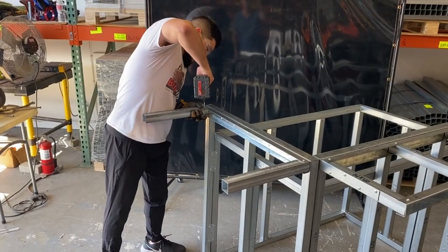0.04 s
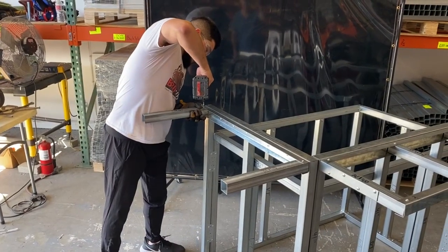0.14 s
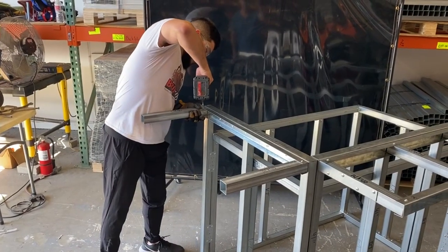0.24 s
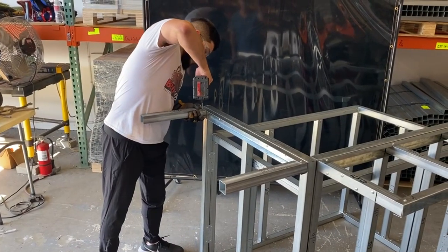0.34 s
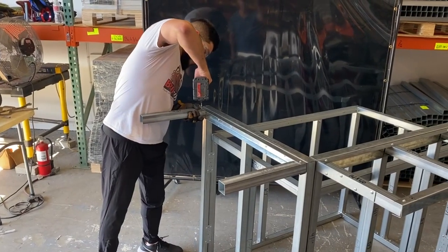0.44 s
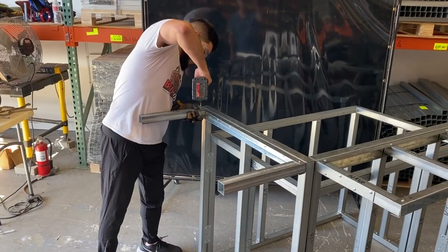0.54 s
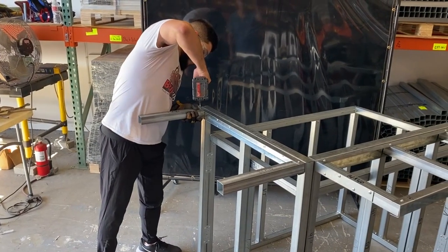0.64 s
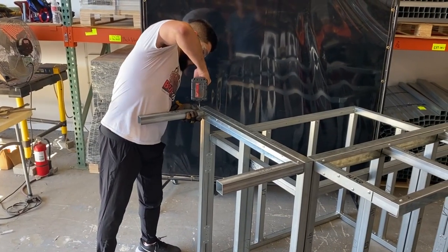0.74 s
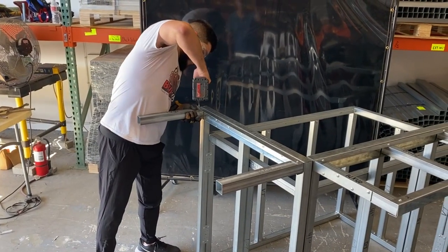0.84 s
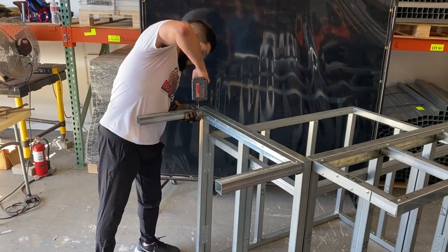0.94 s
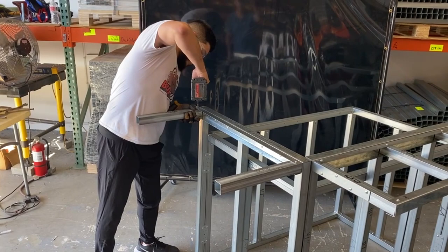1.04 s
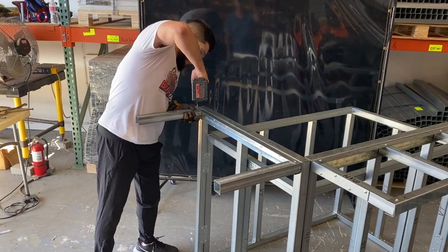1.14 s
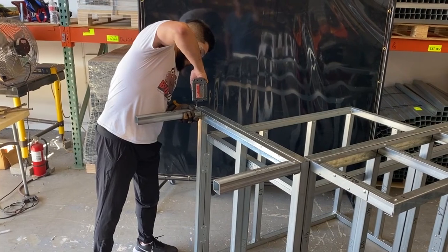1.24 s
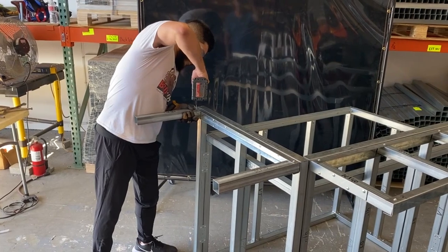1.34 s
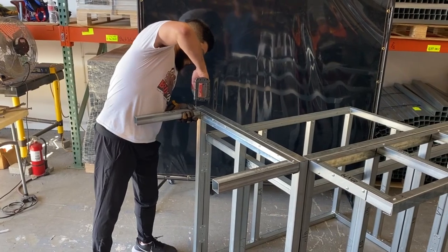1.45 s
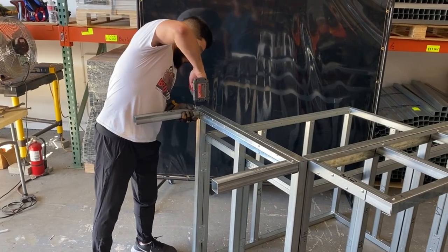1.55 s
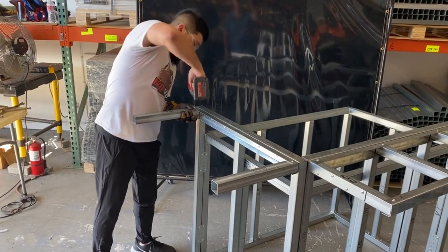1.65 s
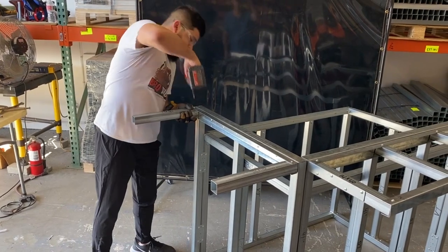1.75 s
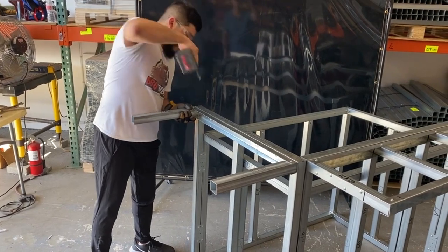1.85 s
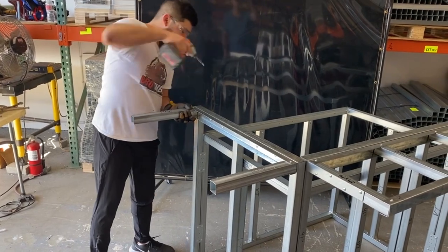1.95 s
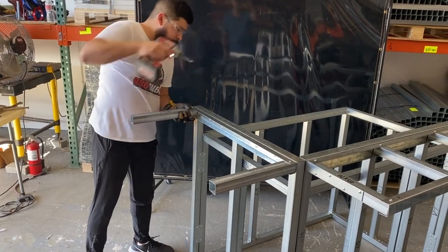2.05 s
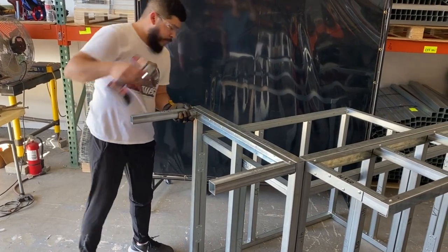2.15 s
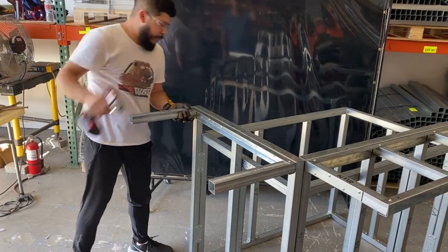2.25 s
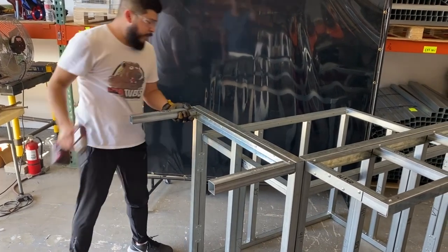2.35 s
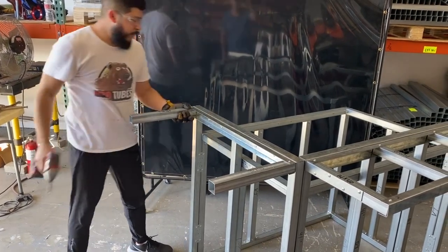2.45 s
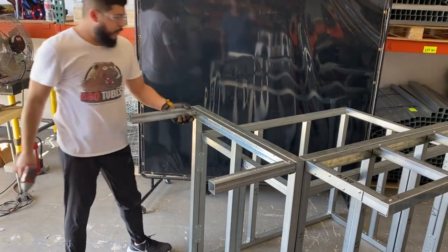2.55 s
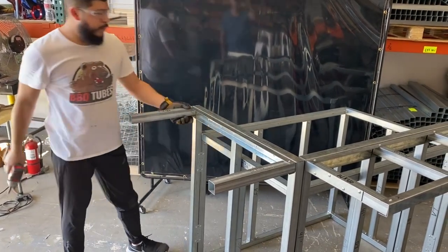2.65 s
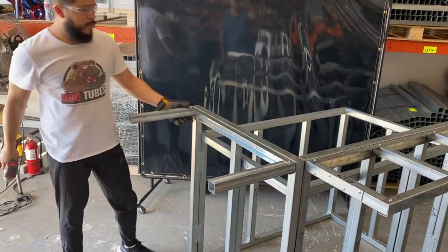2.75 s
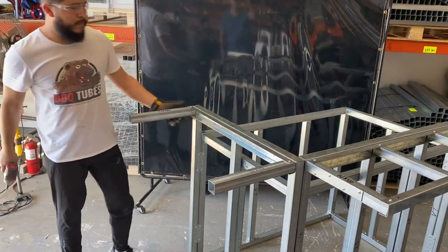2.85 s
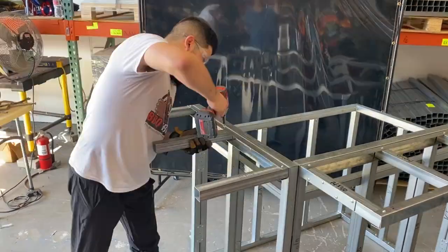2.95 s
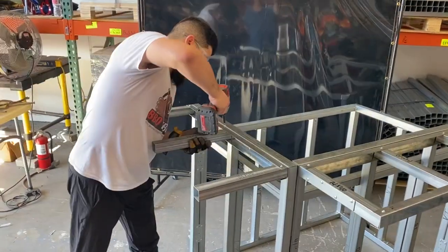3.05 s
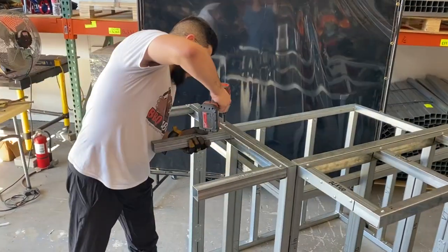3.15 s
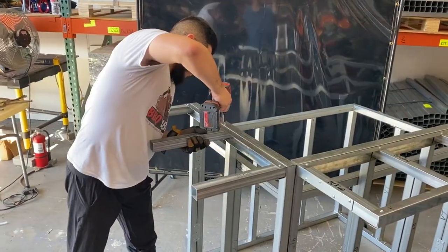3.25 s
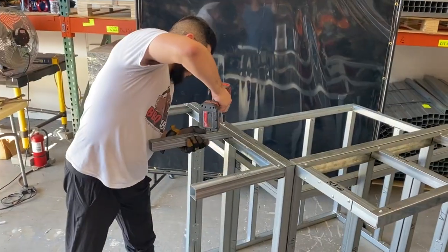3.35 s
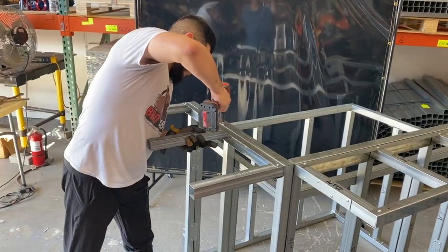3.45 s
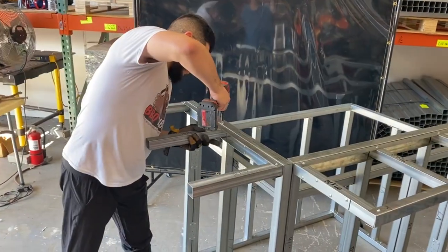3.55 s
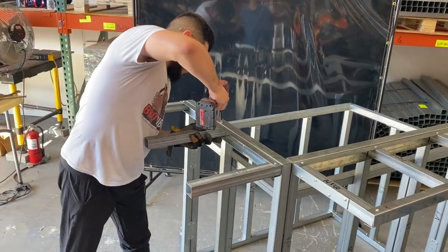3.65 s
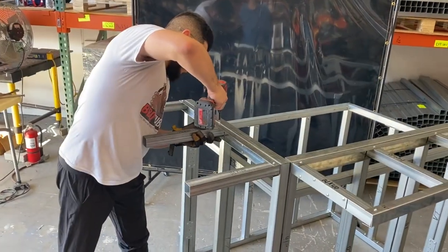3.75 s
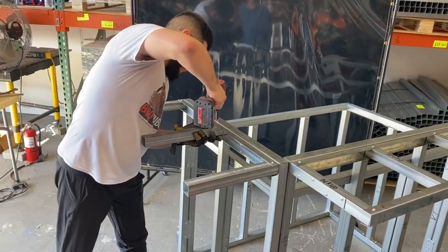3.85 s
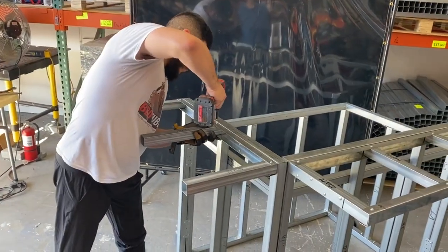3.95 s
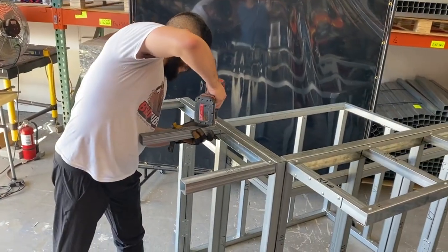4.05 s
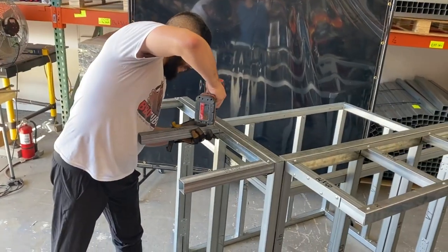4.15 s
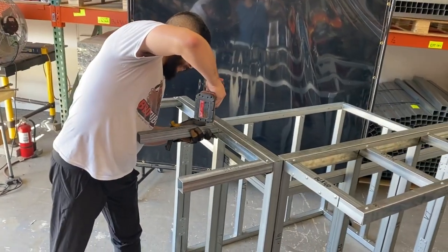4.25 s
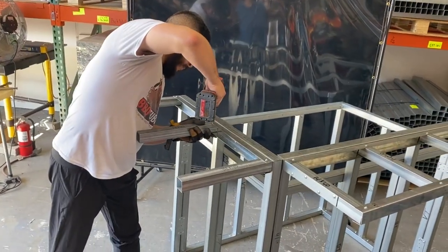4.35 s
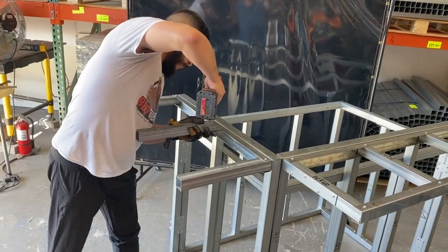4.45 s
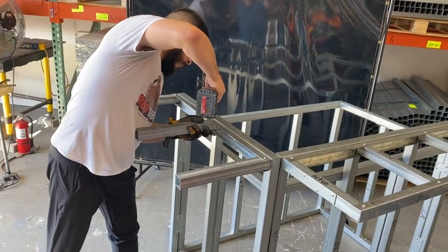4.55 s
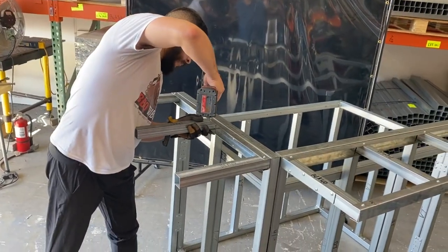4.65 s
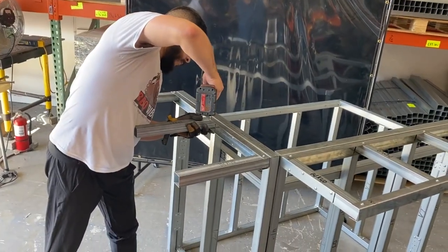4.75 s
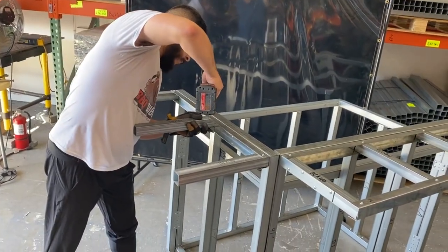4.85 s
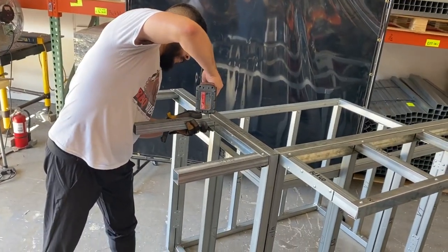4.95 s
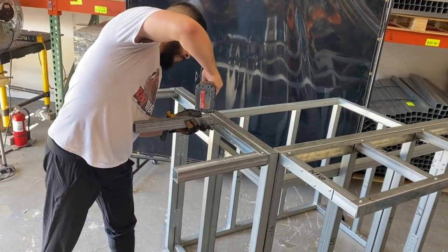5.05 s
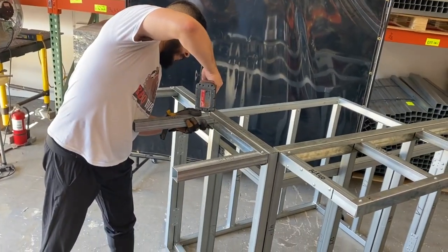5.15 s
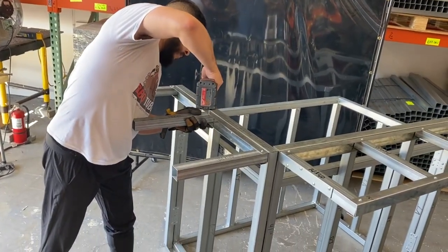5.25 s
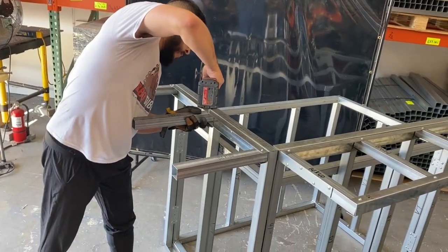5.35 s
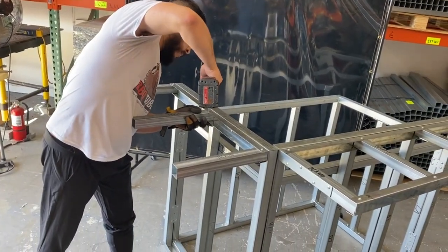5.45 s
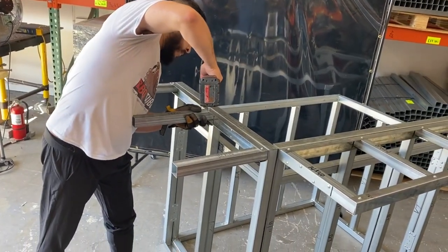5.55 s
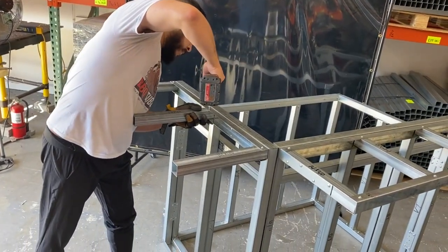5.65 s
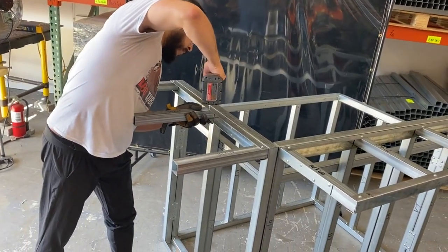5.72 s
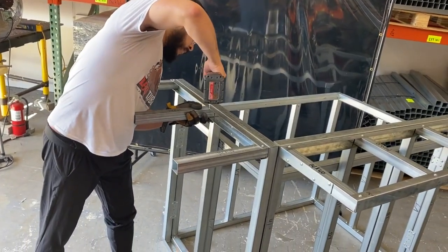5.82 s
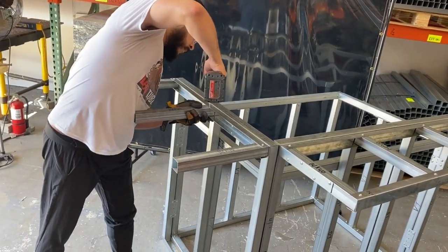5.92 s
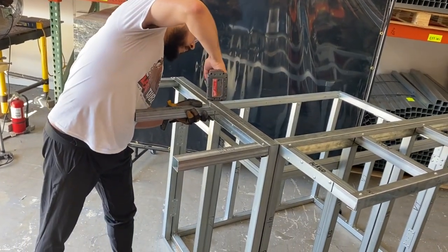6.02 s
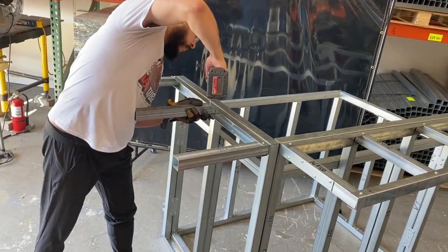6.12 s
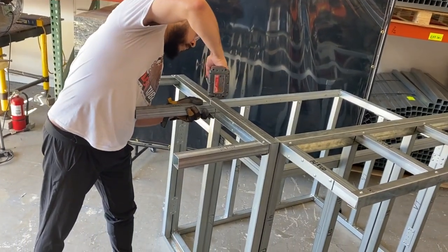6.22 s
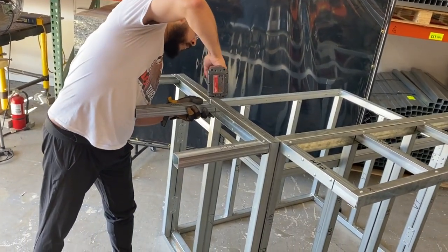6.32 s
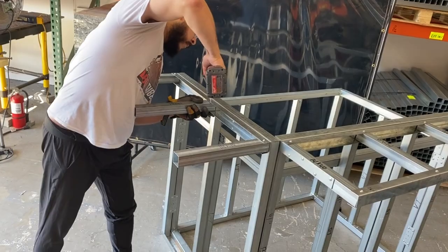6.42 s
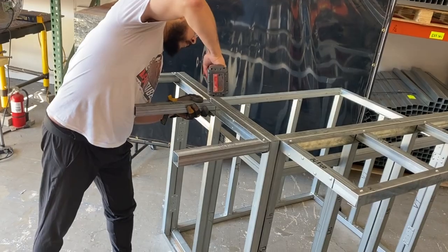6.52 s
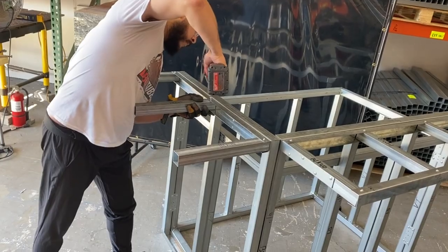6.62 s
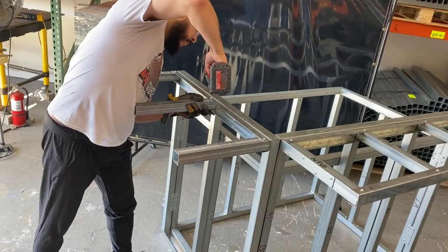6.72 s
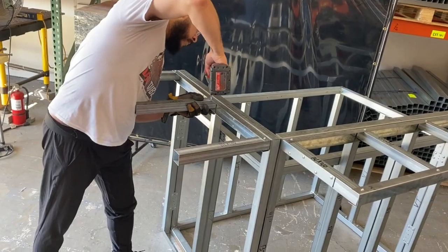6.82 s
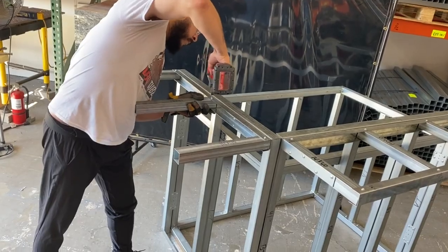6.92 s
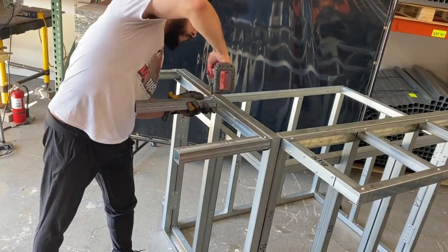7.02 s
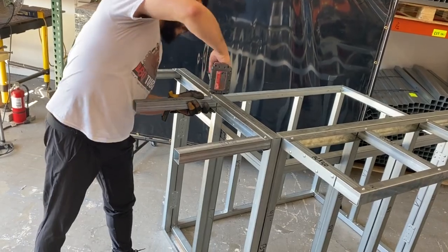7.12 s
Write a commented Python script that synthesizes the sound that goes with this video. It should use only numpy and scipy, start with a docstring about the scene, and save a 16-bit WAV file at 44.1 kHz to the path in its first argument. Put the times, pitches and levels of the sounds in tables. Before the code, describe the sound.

A cordless impact driver works on a steel tube frame in an open-fronted, reverberant workshop, heard in stereo from a few metres, with low ventilation rumble throughout. From 0 s the motor is already whining under load, with a rough gear whirr and harsh chatter of the tip cutting steel. Its pitch sags, and from 1.25 to 1.6 s quick hammer blows rattle about 35 times a second before the motor stops. A metallic knock comes near 1.86 s, then faint rustling and scraping; the sound drops out briefly at 3 s. A dull knock lands at 4.0 s, small scrapes and taps at 4.2 s. At 4.8 s the tip groans, then slips with a bright clatter at 4.97 s as the motor spins up. It runs freely, bites around 6 s, sinks in pitch, and hammers from 6.75 s until the end at about 7.1 s.

```python
"""A cordless impact driver sinks two self-drilling screws into a frame of steel tube in an open-fronted workshop.
Rotor tones sag as the tip bites and chatters in the tube wall; noise bursts make the hammer rattle each screw tight.
Between the screws the frame is knocked and scraped, as noise ringing through tube modes; ventilation rumbles behind.
The driver's motor is heard more directly than the wide frame, and the level dips once briefly."""
import sys
import numpy as np
from scipy import signal
from scipy.fft import rfft, irfft, next_fast_len
from scipy.io import wavfile

SR = 44100
rng = np.random.default_rng(int(sys.argv[2]) if len(sys.argv) > 2 else 0)


def store_wav(level_fs):
    """Save 16-bit WAV to argv[1]."""
    pcm = np.round(np.clip(np.atleast_2d(level_fs), -1, 1) * 32767)
    wavfile.write(sys.argv[1], SR, pcm.T.astype(np.int16))


N = 316549
TIME = np.arange(N) / SR  # seconds

# All levels are relative, ahead of load, room and final mix.
# Trigger pulls, the first before the start: pulled_s, released_s, gear_level_db, whine_level_db, hum_level_db
TRIGGER_PULLS = [(-1, 1.59, -31.2, -37.5, -44), (4.775, 7.07, -29.7, -36, -36)]
SPIN_UP_S, GEARS_RISE_S, RUN_DOWN_T60_S = .2, .21, .18
FREE_SPEED = 360  # turns per s without load
GEARS_DB_PER_LOAD, WHINE_DB_PER_LOAD = 22, 12
# Below this speed (turns per s) all motor tones lose so many dB per turn/s
STALL_SPEED, STALL_DB = 290, .6
# Motor speed under the load of each screw, before spin-up: time_s, speed_turns_per_s
FIRST_SCREW_SPEED = [(0, 322), (.15, 313), (.42, 315), (.58, 318), (.88, 311), (1.22, 288), (1.6, 270)]
SECOND_SCREW_SPEED = [(5.42, 359), (5.62, 352), (5.9, 334), (6.12, 307), (6.34, 321.5), (6.56, 316),
                      (7.1, 268)]
# Tones of rotor, gears and fan: multiple_of_turning_rate, level_db
ROTOR_TONES = [(1, -21), (2, -2.5), (3, -7), (4, -20), (8, -14.5), (11, -12), (15, 3), (22, -8), (30, -4.5)]
# Colour of the gear rattle, also of the slipping bit: pitch_hz, level_db
GEAR_COLOUR = [(100, -10.5), (350, -17.5), (800, -5.5), (1500, -3.5), (3000, -4.5), (3900, -2), (5000, -3),
               (7200, -6), (8800, -4.5), (10300, -7), (12500, -10.5), (15800, -10.5)]
# Motor coasting after the first screw: start_s, rise_s, end_s, level_db, sag_db_per_s
COASTS = [(1.6, .02, 1.8, -52, 0)]

# Tip biting into the steel: start_s, rise_s, end_s, level_db, sag_db_per_s
BITES = [(0, .18, 1.28, -23.3, 2.5), (.33, .11, .46, -23, 0), (5.95, .21, 6.72, -26, 13),
         (6.66, .13, 6.86, -26, 10)]
BITE_T60_S = .2
# Colour of the chips, also of the slip's jolt: pitch_hz, level_db
BITE_COLOUR = [(50, -35), (130, -8), (220, -10), (350, -4.5), (550, -6), (1000, -1.5), (1250, -3),
               (1600, 0), (2200, -1.5), (2900, -9.5), (4000, -6.5), (6500, -15), (9000, -25),
               (16000, -31.5)]
# Colour of the thump at each catch: pitch_hz, level_db
CATCH_COLOUR = [(70, -5.5), (215, 2.5), (400, -3), (900, -3.5), (2500, -39)]
# Ringing modes of the steel frame: pitch_hz, level_db, t60_s
FRAME_MODES = [(554, -12, .3), (825, -4, .15), (1110, -4, .2), (1351, -4, .4), (1497, 0, .2),
               (1556, -2, 1.4), (1762, 4.5, .35), (1865, -2, .25), (2068, -7, .2), (2490, -9, .15),
               (2821, -6, .2), (3090, -4, .2), (3182, -10, .7), (3480, -6, .2), (3865, -5, .4),
               (3995, 2.5, .15), (4070, 2.5, .15), (4200, -6, .2)]

# Whirr of the loaded gear mesh: start_s, rise_s, end_s, level_db, sag_db_per_s
WHIRRS = [(-.1, .1, 1.2, -30, 9), (5.55, .25, 6.55, -30.5, 1.5)]
WHIRR_T60_S = .3

# Colour of the ventilation: pitch_hz, level_db
RUMBLE_COLOUR = [(20, -32.5), (46, -4), (70, 0), (126, -3), (155, -12), (380, -22), (800, -27), (1650, -33),
                 (3100, -53.5), (8000, -65), (15000, -72)]

# Hammer blows: time_s, first_crack_db, bright_clack_db, tube_thud_db
BLOWS = [(1.2446, -17, -16, -14), (1.272, -24, -18, -16), (1.2964, -24, -17, -27),
         (1.3219, -15, -11.5, -24), (1.3513, -12, -13.5, -26), (1.3815, -22, -16, -29),
         (1.4077, -17, -11, -30), (1.4346, -22, -18, -36), (1.4626, -14, -16, -34), (1.4944, -26, -20, -38),
         (1.5254, -18, -16.5, -36), (1.5494, -13, -14.5, -32), (1.5708, -13, -13, -32),
         (1.591, -18, -16, -30), (6.7534, -20, -12, -18), (6.7815, -8, -16, -26), (6.8064, -15, -18, -24),
         (6.879, -24, -16, -20), (6.9735, -11, -11, -34), (6.9955, -17, -15, -42),
         (7.0165, -12, -12.5, -35), (7.041, -17, -17, -40), (7.069, -13, -17, -38)]
# Colours of clack and thud: pitch_hz, level_db
CLACK_COLOUR = [(80, -12.5), (300, -17.5), (900, -20), (2000, -1), (3600, 5), (6500, -2), (8800, 1),
                (10700, 2.5), (12500, -1), (14700, 1.5), (16000, -3)]
THUD_COLOUR = [(100, -18), (500, -10), (1000, -3), (1500, 4.5), (2300, 0), (4000, -8), (9000, -25),
               (16000, -32)]
# Colour of the first screw's seating bump: pitch_hz, level_db
BUMP_COLOUR = [(40, -13), (120, -1), (1200, -29.5)]

# Knocks of the tool and the loose tube: time_s, dull_thud_db, metallic_clank_db
KNOCKS = [(1.857, -38, -38), (2.716, -55, -68), (3.661, -54, -70), (3.9983, -30, -50), (4.176, -58, -49),
          (4.216, -60, -51)]
# Colours of the dull thud and the clank: pitch_hz, level_db
KNOCK_COLOUR = [(100, -25), (450, -7), (800, 5.5), (1250, 4.5), (1800, -5.5), (2600, -10.5), (3600, -21.5),
                (7000, -42.5), (16000, -50)]
CLANK_COLOUR = [(500, -17), (1500, -6), (2500, 0), (3600, -11), (12000, -34)]
# Glove and tool sliding on the frame: start_s, rise_s, end_s, level_db, sag_db_per_s
SLIDES = [(1.95, .25, 2.27, -72, 0), (2.68, .065, 2.755, -56.5, 50), (4.134, .008, 4.172, -47, 60),
          (4.171, .008, 4.232, -44, 60)]
# Cloth and gloves rustling: start_s, rise_s, end_s, level_db, sag_db_per_s
RUSTLES = [(2.03, .02, 2.12, -68, 0), (2.226, .006, 2.245, -63, 0), (2.68, .025, 2.76, -59, 40),
           (3.46, .05, 3.95, -64, 0)]
SLIDE_T60_S, RUSTLE_T60_S = .18, .22
# Colours of scrape and rustle: pitch_hz, level_db
SCRAPE_COLOUR = [(300, -8), (1900, 3.5), (3300, -4), (4100, -1.5), (5600, -9.5), (15000, -29)]
RUSTLE_COLOUR = [(900, -14), (2500, -18), (7000, -25.5), (15000, -24.5)]

# Groan of the tip skating on the steel: time_s, pitch_hz, level_db
GROAN = [(4.78, 1150, -48), (4.845, 1020, -39), (4.874, 860, -36), (4.894, 1060, -28), (4.925, 1000, -48)]
# The bit slips and clatters in the screw head
SLIP_S, SLIP_DB, SLIP_THUD_DB, SLIP_HOLD_S, SLIP_T60_S = 4.9695, -15.5, -31, .018, .38

# Decay of the workshop: pitch_hz, t60_s
HALL_T60 = [(150, .6), (600, .45), (1500, 1.05), (4000, .8), (8000, .48), (15000, .36)]
ALIKE_ABOVE_HZ = 8000  # echo bands starting above this are the same in both channels
# Level of the left channel over the right: pitch_hz, level_db
CHANNEL_BALANCE = [(350, -2.3), (1450, -1.5), (2400, 1.7), (3700, 0), (5100, 3.3), (6200, .5), (7400, 2),
                   (8700, 0)]
# Phase lead of the left channel over the right: pitch_hz, lead_radians
CHANNEL_LEAD = [(250, .1), (1500, .6), (4500, 1.2), (6600, .3), (8350, -3.1), (10100, -6.3), (12100, -9.4),
                (14000, -12.6), (16000, -15.7)]
# Brief dip in level: time_s, share_of_signal_lost
LEVEL_DIP = [(2.979, 0), (2.982, .97), (3.003, .97), (3.007, 0)]
CUTOFF_HZ = 15900


def from_db(db):
    """Decibels to gain."""
    return 10 ** (np.asarray(db) / 20)


def rms_one(x):
    """Scale to unit rms."""
    return x / np.sqrt(np.mean(x ** 2) + 1e-20)


def unit_energy(response):
    """Scale an impulse response so that it passes white noise at equal power."""
    return response / np.sqrt(np.sum(response ** 2, axis=-1, keepdims=True))


def in_time(rows):
    """Read a two-column table at every sample."""
    return np.interp(TIME, *np.transpose(rows))


def at_hz(points, hz):
    """Read a table on a log-frequency axis."""
    freqs, values = np.transpose(points)
    return np.interp(np.log(np.maximum(hz, 1)), np.log(freqs), values)


def drift(rate):
    """Chance values of spread 1, rate per second, joined by straight lines."""
    knots = rng.standard_normal(N // 20)
    return np.interp(TIME * rate, np.arange(len(knots)), knots)


def convolve(x, response):
    """Play a mono or stereo signal through a response."""
    return signal.fftconvolve(np.atleast_2d(x), np.atleast_2d(response), axes=-1)[:, :N]


def colour(x, spectrum, size=8192):
    """Causal (minimum-phase) filter of the given spectrum, at unit power."""
    hz = np.arange(size // 2 + 1) * SR / size
    cepstrum = irfft(np.log(from_db(at_hz(spectrum, hz))))
    # fold the cepstrum forward in time for minimum phase
    cepstrum[1:size // 2] *= 2
    cepstrum[size // 2 + 1:] = 0
    response = irfft(np.exp(rfft(cepstrum)))
    return convolve(x, unit_energy(response))


def grains(per_s, spread_db):
    """Random tiny contacts of uneven but bounded size, rms 1."""
    strength_db = spread_db * np.clip(rng.standard_normal(N), -2, 2)
    sizes = rng.uniform(-0.98, 1, N) * from_db(strength_db)
    return rms_one((rng.random(N) < per_s / SR) * sizes)


def bursts(times, levels_db, hold, t60):
    """Noise bursts that hold, die away and end after a quarter second; overlaps add in power."""
    power = np.zeros(N)
    age = TIME[:SR // 4]
    shape = from_db(-60 * np.maximum(age - hold, 0) / t60)
    for time_s, level_db in zip(times, levels_db):
        part = power[int(time_s * SR):][:len(age)]
        part += (from_db(level_db) * shape[:len(part)]) ** 2
    return np.sqrt(power) * rng.standard_normal(N)


def stroke(start, rise, end, db, sag, t60):
    """Gain of one action: it rises evenly, sags while it lasts, then dies away."""
    attack = np.clip((TIME - start) / max(rise, .001), 0, 1)
    held = np.clip(TIME - start - rise, 0, max(end - start - rise, 0))
    fade_db = 60 * np.maximum(TIME - end, 0) / t60
    return attack * from_db(db - sag * held - fade_db)


def strokes(rows, t60):
    """Gain of a table of actions, added in power."""
    return np.sqrt(sum(stroke(*row, t60) ** 2 for row in rows))


def frame(force, ring_db):
    """A force is heard directly and through the long modes of the tubes."""
    age = TIME[:SR]
    modes = 0
    for hz, db, t60 in FRAME_MODES:
        decay = from_db(db - 60 * age / t60) / np.sqrt(t60)
        phase = rng.random((2, 1))  # its own in each channel
        modes = modes + decay * np.sin(2 * np.pi * (hz * age + phase))
    return force + from_db(ring_db) * convolve(force, unit_energy(modes))


def ventilation(level_db=-49.0, apart_db=-13, hum_db=-58):
    """A low rumble of coloured noise, nearly alike in both channels, with a wavering hum."""
    mid, side = rng.standard_normal((2, N))
    rumble = colour(mid + from_db(apart_db) * side * [[1], [-1]], RUMBLE_COLOUR)
    hum = sum(np.sin(2 * np.pi * hz * TIME + drift(18)) for hz in (64, 119))
    return from_db(level_db) * rumble + from_db(hum_db) * hum


def drive():
    """Motor speed, load (share of free speed lost) and spin-up (0-1 since the trigger was pulled)."""
    loaded = in_time(FIRST_SCREW_SPEED + SECOND_SCREW_SPEED)
    pulled = np.array(TRIGGER_PULLS)[:, 0]
    age = TIME - pulled[np.searchsorted(pulled, TIME) - 1]
    spin = 1 - np.exp(-(age / SPIN_UP_S) ** 2)
    return loaded * spin, 1 - loaded / FREE_SPEED, spin


def motor(turns, speed, load, spin, flutter_db=0.8, wobble=.008, spin_power=0.8):
    """Rotor-locked tones: low hum from fan and unbalance, high whine that flickers more and grows with load."""
    angle = 2 * np.pi * (turns + wobble * drift(45))
    hum_rows = [(on, SPIN_UP_S, off, hum_db, 0) for on, off, _, _, hum_db in TRIGGER_PULLS]
    whine_rows = [(on, SPIN_UP_S, off, whine_db, 0) for on, off, _, whine_db, _ in TRIGGER_PULLS]
    hum = strokes(hum_rows, RUN_DOWN_T60_S)
    whine = strokes(whine_rows, RUN_DOWN_T60_S) * from_db(WHINE_DB_PER_LOAD * load)
    tones = 0
    for multiple, db in ROTOR_TONES:
        flicker_db = flutter_db * np.sqrt(min(multiple, 20)) * drift(30)
        gain = from_db(db + flicker_db) * (hum if multiple < 10 else whine)
        tones = tones + gain * np.sin(multiple * angle + 2 * np.pi * rng.random())
    stall = from_db(STALL_DB * np.minimum(speed - STALL_SPEED, 0))
    return spin ** spin_power * stall * tones


def gears(turns, load, pulsing=0.27):
    """Teeth and bit rattle finely, a little harder once each turn and louder under load."""
    pulse = 1 + pulsing * np.sin(2 * np.pi * turns)
    rattle = grains(9000, 2.9) * pulse * from_db(0.38 * drift(90))
    rows = [(on, GEARS_RISE_S, off, gear_db, 0) for on, off, gear_db, _, _ in TRIGGER_PULLS]
    driven = strokes(rows, RUN_DOWN_T60_S) * from_db(GEARS_DB_PER_LOAD * load)
    coasting = strokes(COASTS, RUN_DOWN_T60_S)
    return colour(rattle * (driven + coasting), GEAR_COLOUR)


def cutting(turns, turns_per_catch=4.36, catch_db=1.0, thump_db=-16):
    """The tip catches in step with the rotor, tearing off chips; on the first screw each catch thumps the tube."""
    catches = turns / turns_per_catch
    clicks = np.diff(np.floor(catches), prepend=0)
    thumps = rms_one(colour(clicks, CATCH_COLOUR))
    chip_db = catch_db * np.cos(2 * np.pi * catches) + 1.8 * drift(40)
    chips = colour(rms_one(grains(7000, 2.0) * from_db(chip_db)), BITE_COLOUR)
    first_screw = TIME < 3
    return (chips + from_db(thump_db) * thumps * first_screw) * strokes(BITES, BITE_T60_S)


def mesh(turns, speed, teeth=6.2, case_hz=2050, case_width_hz=190, backlash=1.1, flutter_db=3):
    """Loaded teeth whirr in a rough tone with two sidebands, each swelling near the gear-case resonance."""
    tones = 0
    for multiple in (teeth - 1, teeth, teeth + 1):
        resonance = 1 / np.hypot(1, (multiple * speed - case_hz) / case_width_hz)
        gain = from_db(flutter_db * drift(22)) * resonance
        jitter = backlash * (drift(260) + drift(60))  # radians
        tones = tones + gain * np.sin(2 * np.pi * multiple * turns + jitter)
    return strokes(WHIRRS, WHIRR_T60_S) * tones


def hammer():
    """Each blow cracks on the anvil, rattles briefly and jolts the tube; the first screw seats with a low bump."""
    times, crack_db, clack_db, thud_db = np.transpose(BLOWS)
    cracks = bursts(times, crack_db, hold=.0015, t60=.012)
    rattle = bursts(times, clack_db, hold=.008, t60=.066)
    clacks = colour(cracks + rattle, CLACK_COLOUR)
    thuds = colour(bursts(times, thud_db, hold=.012, t60=.08), THUD_COLOUR)
    bump = colour(bursts([1.573], [-34], hold=.02, t60=0.11), BUMP_COLOUR)
    return clacks + thuds + bump


def handling():
    """Knocks are noise bursts, scrape and rustle fine grains; clank and scrape also ring the frame."""
    times, thud_db, clank_db = np.transpose(KNOCKS)
    thuds = colour(bursts(times, thud_db, hold=0.0065, t60=0.15), KNOCK_COLOUR)
    clanks = colour(bursts(times, clank_db, hold=0.006, t60=0.18), CLANK_COLOUR)
    scrape = colour(grains(5000, 2.0) * strokes(SLIDES, SLIDE_T60_S), SCRAPE_COLOUR)
    rustle = colour(grains(5500, 3.0) * strokes(RUSTLES, RUSTLE_T60_S), RUSTLE_COLOUR)
    return thuds + frame(clanks + scrape, ring_db=-7.5) + rustle


def groan(stick_db=2.5, wander=.15):
    """Stick and slip of the tip: a rough, wavering tone."""
    times, hz, db = np.transpose(GROAN)
    pitch_hz = np.interp(TIME, times, hz) * (1 + wander * drift(500))
    level_db = np.interp(TIME, times, db) + stick_db * drift(600)
    skating = (TIME > times[0]) & (TIME < times[-1])
    return skating * from_db(level_db) * np.sin(2 * np.pi * np.cumsum(pitch_hz) / SR)


def slip():
    """The bit jumps in the screw head: a bright clatter and a jolt into the tube."""
    clatter = colour(bursts([SLIP_S], [SLIP_DB], SLIP_HOLD_S, SLIP_T60_S), GEAR_COLOUR)
    jolt = colour(bursts([SLIP_S], [SLIP_THUD_DB], SLIP_HOLD_S, SLIP_T60_S), BITE_COLOUR)
    return clatter + jolt


def workshop(x, early_db, early_t60=0.16, late_db=-14):
    """After the direct sound, nearby steel and floor scatter the middle range, then the hall rings."""
    age = TIME[:SR * 3 // 2]

    def echoes(low, high, t60):
        """One band of dying reflections, unlike in the two channels except in the top treble."""
        white = rng.standard_normal((2, len(age)))
        band = signal.butter(2, [low, high], "band", fs=SR, output="sos")
        noise = signal.sosfilt(band, white)
        if low > ALIKE_ABOVE_HZ:
            noise = noise[[0, 0]]
        return noise * from_db(-60 * age / t60)

    early = unit_energy(echoes(500, 7000, early_t60) * (age > .002))
    edges = np.geomspace(60, 17000, 11)
    late = 0
    for low, high in zip(edges, edges[1:]):
        late = late + echoes(low, high, at_hz(HALL_T60, np.sqrt(low * high)))
    late = unit_energy(late * (1 - np.exp(-age / 0.057)))  # the hall builds up gradually
    return x + convolve(x, from_db(early_db) * early + from_db(late_db) * late)


def left_and_right(x):
    """The left and right channels differ in phase and level, by frequency."""
    size = next_fast_len(N + SR // 10)
    hz = np.fft.rfftfreq(size, 1 / SR)
    left = from_db(at_hz(CHANNEL_BALANCE, hz) / 2)
    right = np.exp(-1j * at_hz(CHANNEL_LEAD, hz)) / left
    return irfft(rfft(x, size) * [left, right], size)[:, :N]


def scene():
    """The wide frame sounds diffuse and the driver's motor more direct, with ventilation behind."""
    speed, load, spin = drive()
    turns = np.cumsum(speed) / SR
    bite = frame(cutting(turns), ring_db=-18)
    rattle = frame(hammer() + slip() + gears(turns, load), ring_db=-19)
    diffuse = bite + rattle + mesh(turns, speed) + groan() + handling()
    direct = motor(turns, speed, load, spin)
    work = workshop(diffuse, early_db=-7) + workshop(direct, early_db=-11)
    background = ventilation() * from_db([[-.9], [.9]])  # a little louder on the right
    return from_db(-2.0) * left_and_right(work) + background


def record(dry):
    """Peaks are rounded, the level dips briefly between the screws, the top is cut."""
    dip = in_time(LEVEL_DIP)
    top_cut = signal.ellip(10, .2, 80, CUTOFF_HZ, fs=SR, output="sos")
    return signal.sosfilt(top_cut, np.tanh(dry) * (1 - dip))


dry = scene()
out = record(dry)
store_wav(out)
```